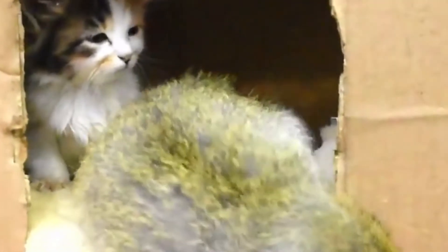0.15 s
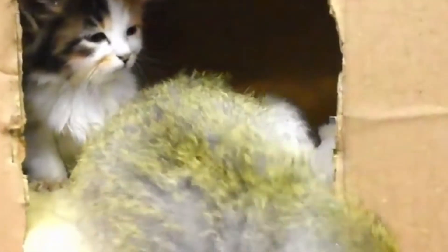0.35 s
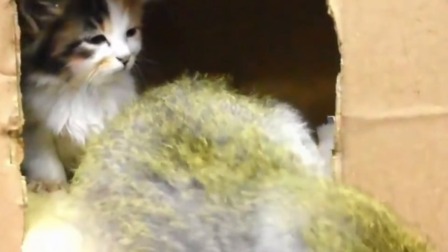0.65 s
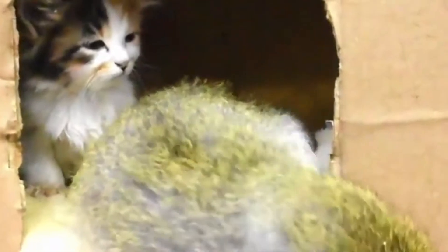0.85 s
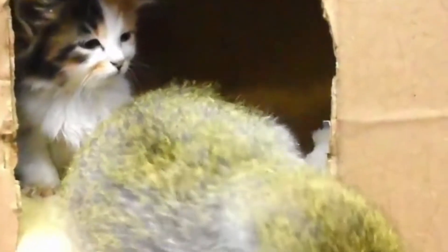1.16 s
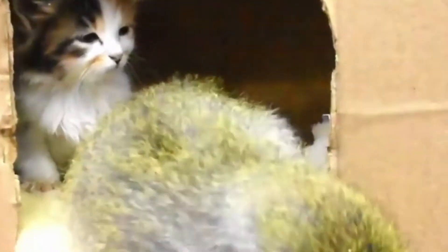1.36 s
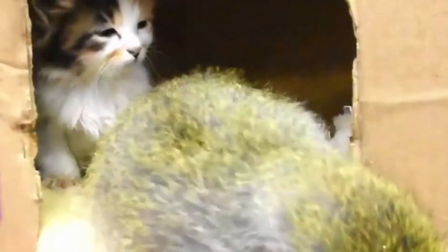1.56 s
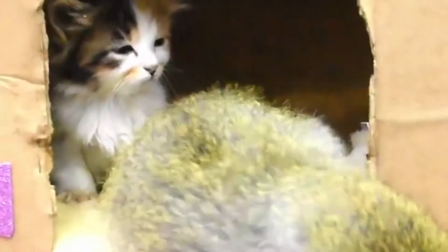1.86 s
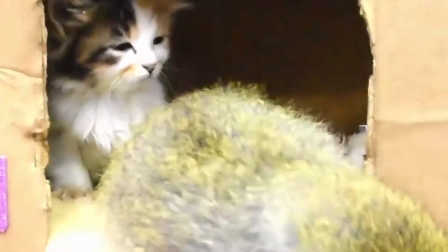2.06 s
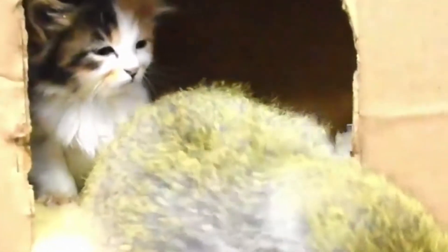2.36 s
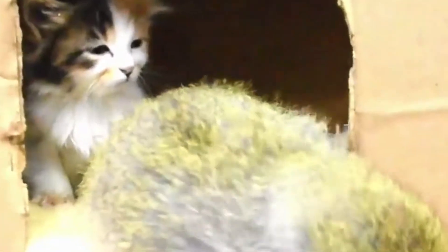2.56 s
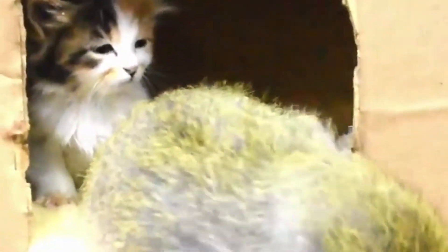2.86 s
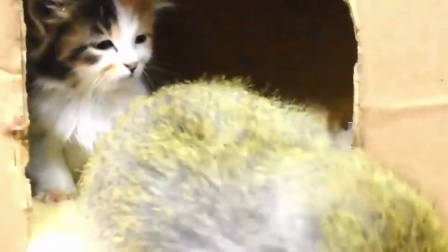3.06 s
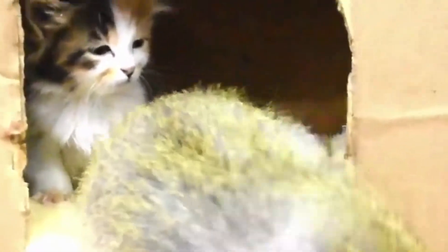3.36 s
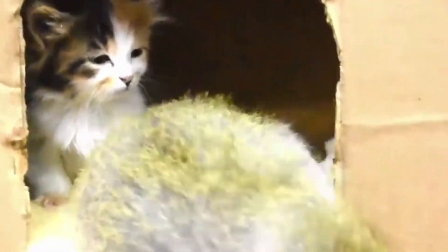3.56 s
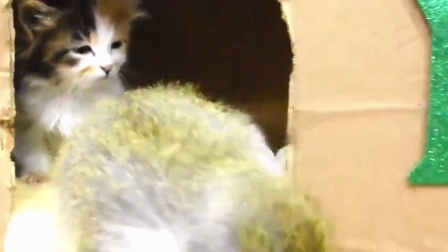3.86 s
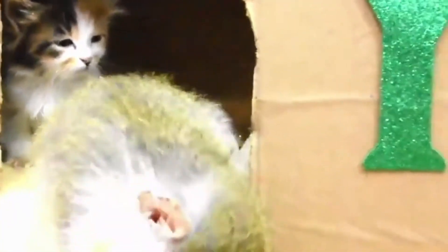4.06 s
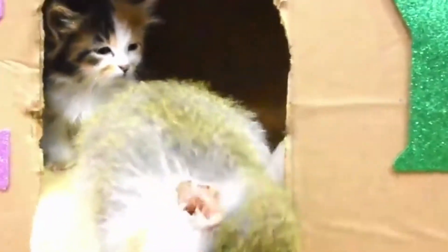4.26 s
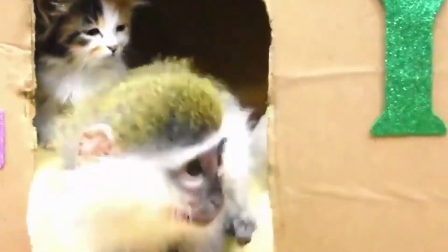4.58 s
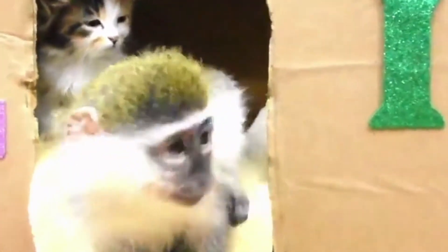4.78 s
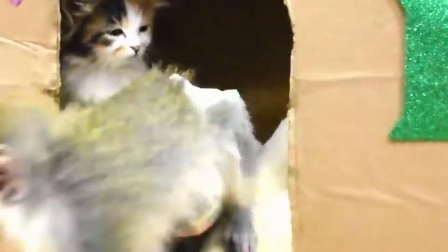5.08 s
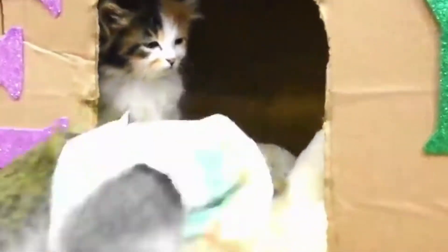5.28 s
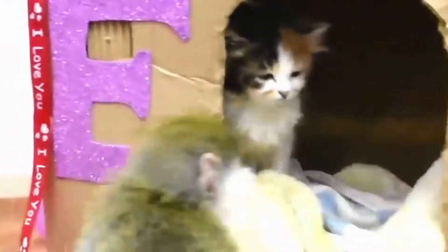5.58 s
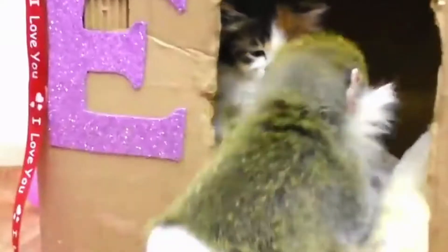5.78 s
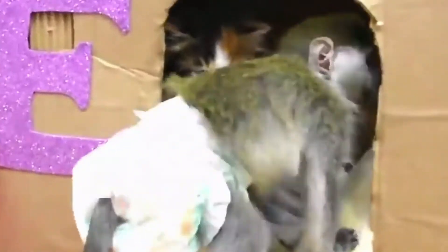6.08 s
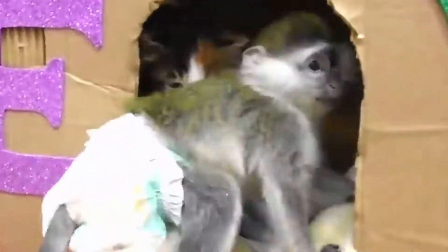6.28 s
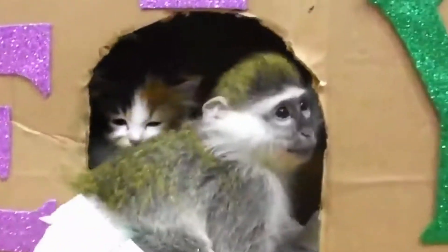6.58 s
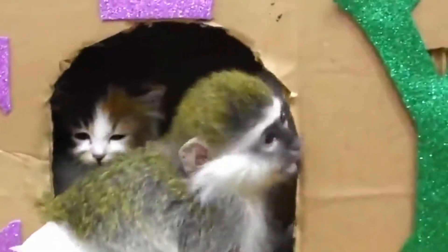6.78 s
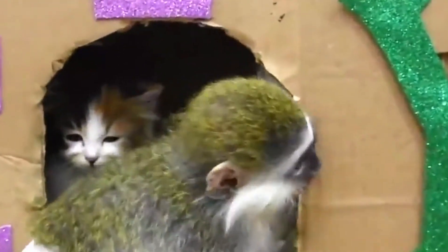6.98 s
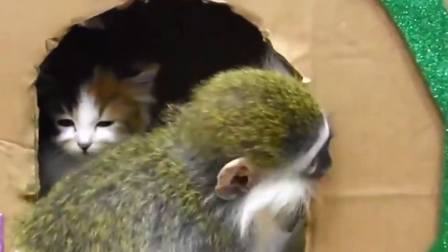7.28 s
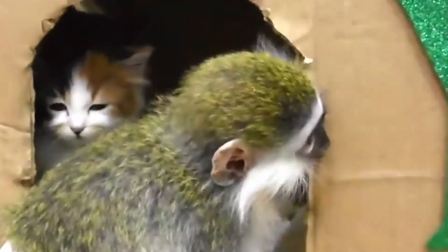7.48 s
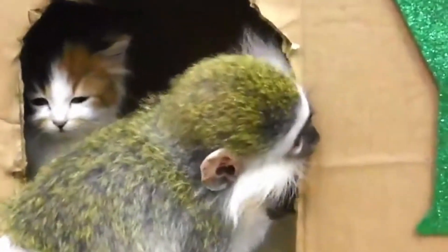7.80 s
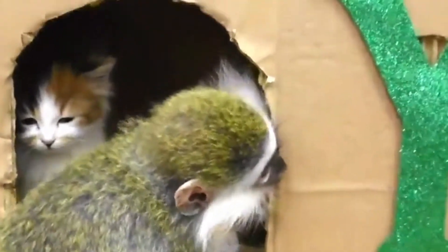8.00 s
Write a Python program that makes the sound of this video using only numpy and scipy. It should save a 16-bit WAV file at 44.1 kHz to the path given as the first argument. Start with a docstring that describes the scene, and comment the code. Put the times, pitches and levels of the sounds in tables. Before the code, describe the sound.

Indoor stereo pickup of small cage birds at several distances. High falling calls and rising whistles come first, followed by a short lull and bright buzzes. A near bird on the right rattles off a long run of hoarse chips, then rests while others call quietly. It returns briefly, and buzzes, tsips and whistles continue to the end. A faint flock, low hoots and steady hiss fill the reverberant background.

```python
"""Small cage birds sing together in a room. The nearest, on the right, runs two series of short raspy
chips: arched sweeps in two voices, coloured by a throat. Around it, from several perches, come
finch-like whistles and calls (nearly pure gliding sines) and buzzes (fast pitch trills).
A far flock of random short notes, low hoots and soft rustles (narrow noise) lie behind, over an airy hiss.
The walls smear the notes of the birds with echoes and a diffuse tail."""
import sys
import numpy as np
from scipy import signal
from scipy.fft import rfft, irfft
from scipy.io import wavfile

SR = 44100
rng = np.random.default_rng(int(sys.argv[2]) if len(sys.argv) > 2 else 0)


def dump(signal):
    """Clip the signal to [-1, 1] and save it as 16-bit WAV at the path in sys.argv[1]."""
    limited = np.clip(np.atleast_2d(signal).T, -1, 1)
    pcm = np.round(limited * 32767).astype(np.int16)
    wavfile.write(sys.argv[1], SR, pcm)


N = 358974
TIME = np.arange(N) / SR  # s


def from_db(db):
    """Decibels to gain."""
    return 10 ** (np.asarray(db) / 20)


def at_hz(points, hz):
    """Read a spectrum on a log-frequency axis."""
    f, value = np.transpose(points)
    return np.interp(np.log(np.maximum(hz, 1)), np.log(f), value)


def at_time(rows, s):
    """Read a curve over time."""
    return np.interp(s, *np.transpose(rows))


def wander(t, rate):
    """Random unsteadiness with a spread a little under 1; a new target comes `rate` times per second."""
    return np.interp(t * rate, np.arange(1024), rng.standard_normal(1024))


def fade(u, rise, fall):
    """Rounded start and end of a note; u runs from 0 to 1, rise and fall are shares of it."""
    fade_in = np.sin(np.pi / 2 * np.clip(u / rise, 0, 1)) ** 2
    fade_out = np.sin(np.pi / 2 * np.clip((1 - u) / fall, 0, 1)) ** 2
    return fade_in * fade_out


def pan_gains(pan_db):
    """Gains of left and right; a positive left-right difference leans left."""
    return from_db([[pan_db / 2], [-pan_db / 2]])


def noise_band(hz, width, size):
    """Noise in one resonance, rms 1."""
    edges = [hz - width / 2, hz + width / 2]
    sos = signal.butter(2, edges, "band", fs=SR, output="sos")
    band = signal.sosfilt(sos, rng.standard_normal(size))
    return band / band.std()


def syrinx(hz, overtone_db=-52):
    """A bird's voice is nearly a pure sine, with a trace of the octave."""
    phase = 2 * np.pi * np.cumsum(hz) / SR
    octave = np.sin(2 * phase) * (hz < SR / 4)
    return np.sqrt(2) * (np.sin(phase) + from_db(overtone_db) * octave)


def add_in_room(out, s, note, pan_db, room_db, t60, near_db, near_s=0.0075, apart=0.15):
    """A note arrives directly, off nearby surfaces and as a diffuse tail, with its own random echoes."""
    t = TIME[:SR // 2]
    mid, side, spikes = rng.standard_normal((3, len(t)))
    # sparse early echoes, about 1500 per second
    near = spikes * (rng.random(len(t)) < 1500 / SR) * np.exp(-t / near_s)
    # the tail differs a little between the ears and swells in over about 1 ms
    decay = from_db(-60 * t / t60) * (1 - np.exp(-t / 0.001))
    tail = (mid + apart * side * [[1], [-1]]) * decay
    echoes = from_db(near_db) * near / np.linalg.norm(near)
    paths = echoes + from_db(room_db) * tail / np.linalg.norm(tail[0])
    paths[:, 0] += 1  # direct sound
    sides = pan_gains(pan_db)
    heard = signal.fftconvolve(note[None], paths, axes=1) * sides / np.sqrt(np.mean(sides ** 2))
    start = max(round(s * SR), 0)
    out[:, start:start + heard.shape[1]] += heard[:, :N - start]


def whistle(hz, db, swell_db, rise=0.094, waver=0.0072):
    """A whistled note softens toward both ends; its pitch and strength are a little unsteady."""
    t = TIME[:len(hz)]
    u = t / t[-1]
    beak_db = at_hz([(7400, -2.0), (8500, -3.0)], hz)  # the very highest pitches lose 1 dB more
    ends_db = -5 * (2 * u - 1) ** 2
    flutter_db = 2.0 * wander(t, 116.0)
    level = from_db(db + beak_db + swell_db * (u - .5) + ends_db + flutter_db)
    unsteady_hz = hz * (1 + waver * wander(t, 399) + 0.00838 * wander(t, 87.7))
    return level * fade(u, rise, fall=0.075) * syrinx(unsteady_hz)


def glide(length, pitches):
    """A pitch that passes smoothly through evenly spaced points, on one polynomial."""
    u = np.linspace(0, 1, max(int(length * SR), 64))
    points = np.linspace(0, 1, len(pitches))
    return np.polyval(np.polyfit(points, pitches, len(pitches) - 1), u)


def air(level_db=-60.6, pan_db=-1.5):
    """Hiss of the room: steady coloured noise, partly alike at both ears."""
    # Spectrum of the hiss. Each row: frequency in Hz, relative level per Hz in dB.
    air_colour = [(25, -21), (100, -26.5), (180, -21), (260, -13.5), (500, -4.5), (900, 0), (1600, -6.5),
                  (2500, -6), (4000, -8.5), (5500, -15), (7500, -20), (8800, -30.5), (11500, -27),
                  (13000, -47.5), (14500, -64.5)]
    # How alike the hiss is in both ears. Each row: frequency in Hz, coherence (held to 0.9 at most below).
    air_likeness = [(60, 0.19), (160, 0.46), (420, 0.72), (1120, 0.56), (2960, 0.058), (7830, 1)]
    hz = np.arange(N // 2 + 1) * SR / N
    mid, side = rfft(rng.standard_normal((2, N)))
    alike = np.clip(at_hz(air_likeness, hz), 0, .9)
    colour = from_db(at_hz(air_colour, hz))
    # the level is that of the part between 200 and 1500 Hz
    colour /= np.sqrt(np.mean(colour ** 2 * ((hz > 200) & (hz < 1500))))
    ears = np.sqrt(1 + alike) * mid + np.sqrt(1 - alike) * side * [[1], [-1]]
    hiss = irfft(colour * ears, N) / np.sqrt(2)
    return hiss * from_db(level_db) * pan_gains(pan_db)


def hoots_and_rustles(pan_db=-10.0):
    """Faint low hoots, and at 4.1 and 6.6 s soft low rustles, as narrow bands of noise."""
    # Hoots and rustles. Each row: start in seconds, length in seconds, centre in Hz, width in Hz, level in dB.
    low_bands = [(0.034, 1.48, 531, 24.8, -68.5), (0.242, 0.55, 1335, 159, -68.5),
                 (1.648, 0.78, 1157, 120, -65.5), (2.46, 0.32, 670, 34.3, -67), (3.265, 1.05, 512, 35, -71),
                 (4.102, 0.53, 388, 60, -75.5), (6.607, 0.49, 410, 200, -73)]
    out = np.zeros(N)
    for s, length, hz, width, db in low_bands:
        shape = fade((TIME - s) / length, rise=0.12, fall=0.34)
        out += noise_band(hz, width, N) * from_db(db) * shape
    return out * pan_gains(pan_db)


def far_flock(slide=0.152, spread_db=3.5, gain_db=-5.0):
    """Distant birds slip short rising or falling notes in at random, heard mostly by the walls."""
    # Groups of the flock. Each row: lowest pitch in Hz, highest pitch in Hz, notes per second,
    # relative level in dB, left-right difference in dB.
    flock_groups = [(1980, 3100, 55, -65.5, -4), (2968, 5600, 90, -62.5, -7.5), (5790, 8400, 34, -65, -1)]
    # How strongly the flock sings. Each row: time in seconds, level change in dB.
    flock_effort = [(0, 8), (.6, -2), (.95, -20), (1.6, -1), (2.3, 8.5), (3.3, 9.5), (3.9, 3.5), (4.4, 2),
                    (4.9, 3), (5.4, 5), (6.2, 6), (6.6, 5.5), (7.1, 8), (7.6, 6), (8.1, 8.5)]
    out = np.zeros((2, N))
    for low, high, per_s, db, pan_db in flock_groups:
        chorus = np.zeros(N)
        for s in np.arange(0, TIME[-1] - .1, 1 / per_s):
            delay, pitch, duration, direction, strength = rng.random(5)
            u = np.linspace(0, 1, int((0.01555 + 0.0309 * duration) * SR))
            bend = slide * np.sign(direction - .65)  # about two in three fall
            hz = low * (high / low) ** pitch * np.exp(bend * (u - .5))
            strength_db = spread_db * (2 * strength - 4)
            level = from_db(gain_db + db + at_time(flock_effort, s) + strength_db)
            start = int((s + delay / per_s) * SR)
            chorus[start:start + len(u)] += (level * syrinx(hz) * np.sin(np.pi * u))[:N - start]
        add_in_room(out, 0, chorus, pan_db, room_db=12, t60=0.45, near_db=0, apart=0.35)
    return out


def buzzes(gain_db=-2.5, pulsing=0.66, sharpening=0.29, uneven=0.13, waver=0.02435, flutter_db=2.5):
    """A trill: the pitch swings, the voice is strongest on each downstroke; rough ones are less even."""
    # Trilled notes. Each row: start in seconds, length in seconds, mean centre pitch in Hz,
    # mean trills per second, roughness (1 = usual), relative level in dB,
    # swell over the note in dB, left-right difference in dB.
    trills = [(1.07, .21, 6450, 283.7, 0.28, -52.5, 22, 1.5), (1.246, 0.1, 6210, 261.6, 0.14, -46, 7, 7),
              (1.309, 0.12, 6460, 165.8, 0.67, -42.5, 8, 2.5), (1.41, 0.11, 6370, 147, 0.42, -44.5, 1, 2),
              (1.335, 0.14, 3290, 150.4, 0.92, -62, -5, -4), (1.549, 0.18, 6390, 48, 1.15, -54.5, 4, -2),
              (1.669, 0.12, 6870, 54.5, 1, -51.5, -5, -3.5), (1.798, 0.48, 7220, 60.1, 1.5, -57, -20, 2.5),
              (1.92, 0.052, 2584, 118, 1.6, -51.5, 3, -10), (5.203, 0.13, 2404, 116.3, 2.6, -55.5, -2, -17),
              (6.149, 0.31, 6740, 225.7, 0.5, -51.5, 5, -5.5), (6.27, 0.14, 2156, 91, 4.4, -61, 5, -13),
              (6.578, 0.049, 2437, 86, 2.2, -52.5, 16, -9), (6.728, 0.11, 5060, 120.3, 1.9, -51, 1, -7),
              (6.8, 0.27, 1478, 96.1, 3.9, -59, -2, -6), (7.07, 0.23, 1452, 97, 4, -57, 1, -5.5),
              (7.28, 0.29, 1400, 96.4, 4, -64.5, 0, -6), (6.993, 0.17, 6720, 208, 0.64, -50.5, -2, 2),
              (7.02, 0.12, 5100, 118, 1.54, -54, -3, -7), (7.1, 0.039, 7300, 119, 0.55, -57, 1, 0),
              (7.16, 0.15, 7830, 219, .4, -63.5, -7, 2), (7.14, 0.28, 6430, 242, 0.39, -44, 5.5, 15),
              (7.505, 0.42, 6750, 45, 0.56, -47, 3.5, 11), (7.52, 0.34, 1418, 110, 4.1, -58.5, -8, -7),
              (7.827, 0.26, 7030, 54, 0.78, -47, 4, 7)]
    out = np.zeros((2, N))
    for s, length, hz, rate, rough, db, swell_db, pan_db in trills:
        swing_hz = 68.6 + 0.066 * hz  # a base amount plus a share of the centre pitch
        t = TIME[:int(length * SR)]
        u = t / t[-1]
        beat = 2 * np.pi * np.cumsum(rate * (1 + uneven * rough * wander(t, 150))) / SR
        depth = pulsing * (200 / rate) ** sharpening  # slower trills pulse harder
        strokes = np.exp(depth * np.cos(beat)) * from_db(flutter_db * wander(t, 140))
        centre_hz = hz * (1 + waver * rough * wander(t, 600))
        voice = syrinx(centre_hz - swing_hz * np.sin(beat)) * strokes
        level = from_db(gain_db + db + swell_db * (u - .5))
        note = voice / voice.std() * level * fade(u, rise=0.085, fall=0.11)
        add_in_room(out, s, note, pan_db, room_db=0.5, t60=0.42, near_db=4.0)
    return out


def calls(swell_db=-4.5, close_db=-40, distant_db=-52, far_loss_db=-1.0, far_room_db=3, far_rise=0.085):
    """Single calls hold or slide in pitch; fainter ones are farther, softer-edged, more by the walls."""
    # Plain calls. Each row: start in seconds, length in seconds, start pitch in Hz, end pitch in Hz,
    # relative level in dB, left-right difference in dB.
    call_notes = [(0, 0.006, 6420, 7800, -34.5, -16), (0.025, 0.053, 7460, 7410, -43, -19),
                  (0.038, 0.083, 6640, 4290, -42.5, -7), (0.005, 0.015, 3890, 3320, -54.5, -5),
                  (0.118, 0.033, 3500, 2600, -58, 1), (0.172, 0.029, 2710, 2250, -59, -5),
                  (0.16, 0.13, 6930, 5130, -53.5, -5), (0.193, 0.018, 8200, 6770, -48.5, 1),
                  (0.212, 0.084, 6680, 4300, -36.5, -6.5), (0.195, 0.02, 3750, 3620, -54, -1),
                  (.256, 0.028, 3270, 2660, -52, -6), (0.326, .025, 3900, 3530, -49.5, -7),
                  (0.393, 0.024, 3440, 2940, -53, -8), (0.466, 0.028, 3800, 3685, -45.5, -4),
                  (0.506, .122, 7010, 3700, -48.5, 6), (0.524, 0.032, 3220, 2550, -54.5, -4),
                  (0.535, 0.034, 8450, 7250, -50.5, -3.5), (0.66, .022, 3210, 2600, -58, -4),
                  (0.73, 0.023, 4000, 3110, -57, -6), (0.861, 0.063, 4900, 4160, -64, 13),
                  (0.985, 0.22, 4220, 4200, -61, -18), (1.011, 0.03, 7400, 6000, -58, 5),
                  (2.561, 0.059, 6740, 6370, -49.5, -10), (2.612, 0.09, 6880, 6320, -41, -2),
                  (2.63, 0.079, 2935, 3020, -49.5, -9), (2.872, .025, 7200, 7020, -40, 0),
                  (3.03, 0.024, 7400, 7930, -36, -3), (3.251, 0.038, 6620, 6550, -32, -4),
                  (3.27, 0.029, 8380, 7250, -44.5, 0), (3.43, 0.047, 6920, 6400, -39, -2),
                  (3.564, 0.13, 3940, 3970, -47.5, 2), (3.571, 0.048, 5640, 6500, -41.5, 12),
                  (3.887, 0.04, 3790, 3610, -44.5, -4), (4.029, 0.1, 3926, 3670, -54, -5),
                  (4.11, 0.024, 1814, 1780, -58, -4), (4.127, 0.21, 3410, 1847, -55.5, -11),
                  (4.187, 0.022, 7300, 8020, -52, 2), (4.247, 0.032, 7500, 8130, -53.5, 3),
                  (4.343, 0.017, 7590, 8350, -53.5, -1), (4.415, 0.024, 7700, 6670, -52.5, -15),
                  (4.416, 0.12, 10330, 10280, -56.5, 16), (4.525, 0.093, 5030, 5220, -57.5, 12),
                  (4.555, 0.057, 4550, 4574, -52, -11), (4.596, 0.028, 6900, 4900, -56.5, 2),
                  (4.883, 0.027, 6130, 7330, -55.5, -1), (4.606, 0.12, 3880, 2760, -62, -3),
                  (4.679, 0.17, 3000, 1707, -54.5, -12), (5.058, 0.11, 4720, 4820, -46.5, -20),
                  (5.095, 0.035, 6770, 6640, -48.5, -18), (5.207, 0.011, 5990, 6830, -37, 0),
                  (5.262, 0.045, 2980, 2590, -44.5, -10), (5.362, 0.019, 8070, 7450, -47.5, -8),
                  (5.442, 0.064, 4750, 4690, -40, -16), (5.706, 0.018, 7310, 5240, -37, 4),
                  (5.829, 0.093, 2794, 2780, -47, -26), (5.994, 0.042, 3293, 3130, -48, -9),
                  (6.223, 0.075, 7160, 5810, -47, -3), (6.281, 0.26, 3987, 4027, -52.5, 0),
                  (6.59, 0.012, 7600, 6160, -51, 3), (6.672, 0.024, 2446, 2430, -41.5, -8),
                  (6.741, 0.037, 5670, 5840, -45.5, -3), (6.854, 0.045, 3920, 3990, -43, -9),
                  (6.983, 0.047, 2493, 2340, -40, -7.5), (7.589, 0.047, 6550, 6140, -48, 6),
                  (7.668, 0.045, 4700, 5660, -52, 3), (7.73, 0.048, 7000, 6030, -47, 8),
                  (7.838, 0.023, 4660, 4720, -47, 2), (7.86, .07, 6930, 6360, -45.5, 9),
                  (8.01, 0.074, 7030, 6480, -47, -2), (7.849, 0.26, 1988, 1452, -56.5, -3),
                  (7.959, 0.024, 8370, 5640, -41, 22), (7.978, 0.046, 5660, 5150, -44, 18)]
    out = np.zeros((2, N))
    for s, length, start_hz, end_hz, db, pan_db in call_notes:
        far = np.clip((close_db - db) / (close_db - distant_db), 0, 1)
        pitch = glide(length, [start_hz, np.sqrt(start_hz * end_hz), end_hz])
        rise = 0.089 + far_rise * far
        note = whistle(pitch, db + far_loss_db * far, swell_db, rise=rise, waver=0.0058)
        room_db = -1.5 + far_room_db * far
        add_in_room(out, s, note, pan_db, room_db, t60=0.69, near_db=3.0, near_s=0.012)
    return out


def arches(swell_db=-0.5, steepening=1.1):
    """An arched whistle eases up to its top and then drops ever faster."""
    # Arched whistles, most of them closing a phrase. Each row: start in seconds, rise in seconds,
    # fall in seconds, start pitch in Hz, top pitch in Hz, end pitch in Hz, relative level in dB,
    # left-right difference in dB.
    arch_notes = [(2.88, 0.038, 0.077, 5300, 7276, 6100, -28.5, -1.5),
                  (3.179, 0.026, 0.054, 6200, 7240, 6490, -26.5, -1.5),
                  (3.469, 0.033, 0.072, 6000, 7820, 6580, -38.5, 0.5),
                  (3.944, 0.022, 0.014, 5360, 5990, 5020, -40.5, 8),
                  (4.322, .018, 0.048, 1924, 2510, 1980, -50, -11),
                  (4.924, 0.026, 0.031, 4470, 5430, 4430, -51.5, -4),
                  (5.197, 0.0236, 0.034, 3850, 5170, 4020, -38.5, -4.5),
                  (5.455, 0.032, 0.032, 4500, 5640, 3570, -37, -4),
                  (5.725, 0.02, 0.027, 5150, 6080, 4380, -36, -4),
                  (7.473, 0.032, 0.053, 5400, 6860, 6250, -42.5, 14),
                  (7.768, 0.026, 0.067, 5900, 7170, 6410, -39, 16),
                  (7.85, 0.038, .048, 4700, 6560, 5260, -45, 2.5),
                  (8.071, 0.018, 0.03, 6300, 7600, 7270, -37, 14)]
    out = np.zeros((2, N))
    for s, rise, fall, start_hz, top_hz, end_hz, db, pan_db in arch_notes:
        up = top_hz + (start_hz - top_hz) * np.linspace(1, 0, int(rise * SR)) ** 2
        down = top_hz + (end_hz - top_hz) * np.linspace(0, 1, int(fall * SR)) ** steepening
        note = whistle(np.concatenate([up, down]), db, swell_db)
        add_in_room(out, s, note, pan_db, room_db=0.5, t60=0.54, near_db=-3.0, near_s=0.0096)
    return out


def add_motif(out, motif, room_db, s, db, pan_db, stretch=1, transpose=1, variation=0.0079):
    """A bird sings a motif once, each pitch a little off at random."""
    for delay, length, *pitches, note_db, swell_db in motif:
        detune = 1 + variation * rng.standard_normal(len(pitches))
        sung_hz = transpose * np.array(pitches) * detune
        note = whistle(glide(stretch * length, sung_hz), db + note_db, swell_db)
        add_in_room(out, s + stretch * delay, note, pan_db, room_db, t60=0.62, near_db=-1.5, near_s=0.013)


def song(motif, repeats, room_db):
    """All repeats of one motif, with one share of room for that motif."""
    out = np.zeros((2, N))
    for row in repeats:
        add_motif(out, motif, room_db, *row)
    return out


def whistles():
    """The whistled motifs from their several perches, each note a glide through a few pitches."""
    # Motifs. Each row is a note: delay in seconds, length in seconds, evenly spaced pitches in Hz,
    # relative level in dB, swell over the note in dB.
    upslur = [(0.0025, .082, 4050, 4540, 5216, 6440, 6160, 0, -1.8)]
    seesaw = [(0, 0.029, 2730, 2807, 2770, 2870, -0.5, -8), (.053, .022, 4190, 3825, 3180, 2840, 0.71, -7)]
    twitter = [(0.004, .027, 8450, 7900, 7200, 6450, -1, 8),
               (0.035, 0.062, 6900, 7520, 6900, 5750, 4600, -0.5, -5)]  # two-note opening of a song phrase
    flourish = [(0, 0.075, 3450, 4080, 4250, 4150, -7.5, -7),
                (.07, .075, 5750, 6050, 6250, 6550, 7400, 0.5, 9)]
    tsip = [(0, 0.062, 3950, 3900, 3500, 3020, 0.0078, -2.3)]
    # When they are sung. Each row: start in seconds, relative level in dB, left-right difference in dB,
    # then time stretch factor and pitch factor (both 1 where left out).
    upslur_times = [(.318, -31.5, -6.5, 1, 1.016), (0.427, -34, -5.5, 0.88, 1.036),
                    (.615, -46.5, 12, .92, 1), (0.721, -49.5, 9, 0.86, 0.98)]
    seesaw_times = [(0.654, -63, -3, 1.36, 0.92), (0.804, -52, -4, 0.94, 1.01),
                    (0.916, -51.5, -3.5, 0.89, 1.03), (1.001, -49.5, -6, 1, 1),
                    (1.111, -50.5, -5, 1.02, 0.96)]
    twitter_times = [(2.754, -36.5, -0.5, 0.9, 0.99), (3.049, -31, -2, 0.91, 0.99),
                     (3.323, -30, 0, 0.9, 1.01), (7.67, -51, 13, 1.06, 0.98)]
    flourish_times = [(3.773, -45.5, 15, 1.03, 1), (5.027, -41, -2, 1.08, 1.035),
                      (5.297, -32.5, -1.5, 1.035, 1.023), (5.565, -31, -2, 1.02, 0.99),
                      (6.572, -44.5, -6, 1.2, .98), (6.851, -47.5, -4.5, 1.16, 0.99)]
    tsip_times = [(6.663, -47, -21), (6.927, -47, -35), (7.192, -50.5, -26), (7.312, -48, -17),
                  (7.429, -47, -19), (7.553, -53, -27)]
    return (song(upslur, upslur_times, room_db=-7.0)
            + song(seesaw, seesaw_times, room_db=-2)
            + song(twitter, twitter_times, room_db=3.5)
            + song(flourish, flourish_times, room_db=0.5)
            + song(tsip, tsip_times, room_db=1.5))


def chips(gain_db=-4.0, low_hz=1750, shoulder=1.65, top_at=0.45, skirt=1.35, flutter_db=0.5,
          pace_spread=.05, roughness=0.015, hoarse=0.12, second_pitch=0.72, second_db=-7):
    """Each chip sweeps up and part-way down in two voices plus rasp; the throat rings near 4600 Hz."""
    # Chips of the near bird, in two runs that slow down. Each row: time in seconds, relative level in dB.
    chip_runs = [(1.8168, -31), (1.877, -26.5), (1.9406, -24.5), (2.007, -23.5), (2.066, -22),
                 (2.1344, -22.5), (2.2028, -21), (2.2685, -21), (2.3325, -19.5), (2.4024, -19),
                 (2.4846, -20), (2.5545, -20.5), (2.6241, -22), (2.6903, -20), (2.7649, -20.5),
                 (2.8387, -21), (2.9113, -21.5), (2.987, -23), (3.0586, -22), (3.1373, -22.5),
                 (3.217, -23.5), (3.3052, -22.5), (3.404, -22.5), (3.491, -23), (3.5761, -23.5),
                 (3.671, -22.5), (3.7802, -24), (5.7954, -33), (5.86, -26), (5.9257, -23.5),
                 (5.9942, -22.5), (6.065, -23), (6.1405, -25), (6.3182, -29)]
    # Pitch at the top of the arch. Each row: time in seconds, pitch in Hz.
    chip_tops = [(1.819, 5810), (1.89, 5110), (2.0, 4876), (2.25, 4770), (2.45, 4658), (2.95, 4774),
                 (3.199, 4950), (3.35, 5220), (3.67, 5415), (3.78, 5150), (5.8, 6030), (5.869, 5684),
                 (6.07, 5516), (6.32, 5370)]
    # Throat and beak. Each row: frequency in Hz, gain in dB.
    throat = [(1650, -29.5), (2200, -19.5), (2700, -31.5), (3500, -24.5), (4150, -12), (4600, -1),
              (5600, -12.5)]
    # Resonances that colour the rasp. Each row: centre in Hz, width in Hz, relative level in dB.
    rasp_bands = [(2215, 590, -30), (3450, 680, -24), (4260, 760, -16.5)]
    # Where the near bird faces. Each row: time in seconds, left-right difference in dB.
    facing = [(3.3, -18), (3.8, -21), (5.8, -30), (6.3, -21)]
    out = np.zeros((2, N))
    for s, db in chip_runs:
        top_hz = at_time(chip_tops, s)
        # half a chip lasts about 14.8 ms at 5123 Hz; higher chips are shorter
        half = .0148 * (5123 / top_hz) ** 2.6 * np.exp(pace_spread * rng.standard_normal())
        t = TIME[:int(2 * half * SR)]
        u = t / t[-1]
        from_top = np.interp(u, [0, top_at, 1], [1, 0, .7])
        arch = np.abs(np.cos(np.pi / 2 * from_top ** (shoulder / 2))) ** skirt
        rasp = sum(from_db(rasp_db) * noise_band(hz, width, len(t)) for hz, width, rasp_db in rasp_bands)
        note = rasp * fade(u, rise=0.17, fall=0.55)
        for pitch, voice_db in [(1, 0), (second_pitch, second_db)]:
            unsteady = roughness + hoarse * (1 - arch)  # hoarse in the low legs
            hz = (low_hz + (pitch * top_hz - low_hz) * arch) * (1 + unsteady * wander(t, 600))
            level = from_db(voice_db + at_hz(throat, hz) + flutter_db * wander(t, 361))
            note = note + syrinx(hz, overtone_db=-42.5) * level * fade(u, rise=0.023, fall=0.07)
        start = s - half + .002  # the listed time falls close to the top of the arch
        add_in_room(out, start, from_db(gain_db + db) * note, at_time(facing, s),
                    room_db=-4.0, t60=0.63, near_db=-2, near_s=0.013)
    return out


def scene():
    """All the birds and the soft rustles over the room's hiss."""
    return (air() + hoots_and_rustles() + far_flock() + buzzes() + calls() + arches()
            + whistles() + chips())


def record(dry):
    """The top is cut steeply above 15 kHz."""
    return signal.sosfilt(signal.ellip(10, .1, 80, 15000, fs=SR, output="sos"), dry)


dry = scene()
out = record(dry)
dump(out)
```